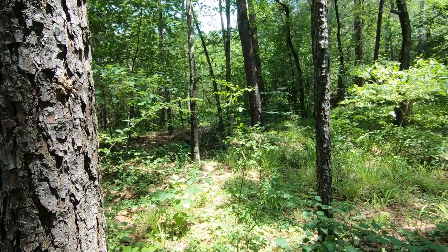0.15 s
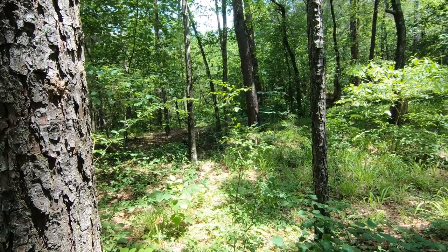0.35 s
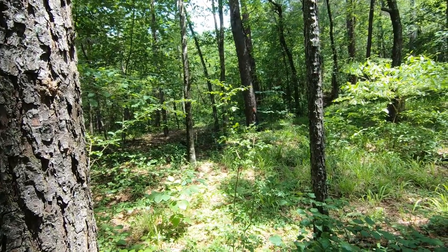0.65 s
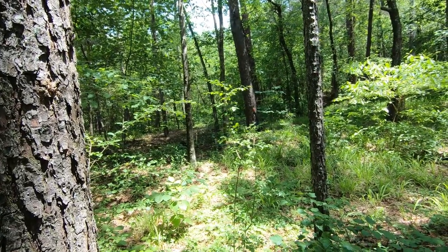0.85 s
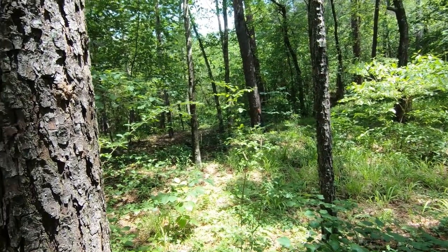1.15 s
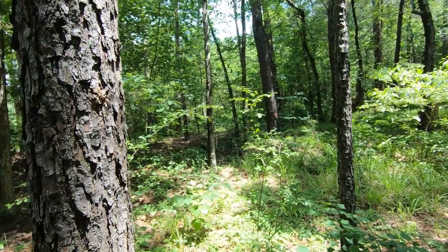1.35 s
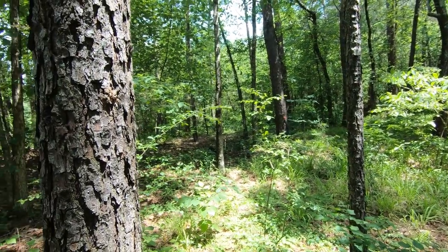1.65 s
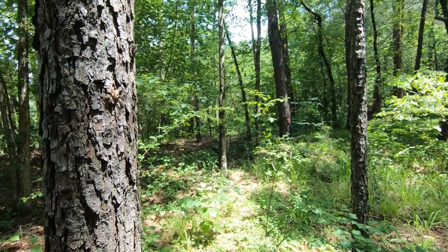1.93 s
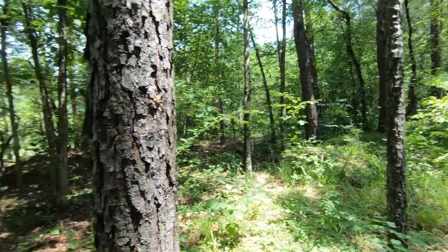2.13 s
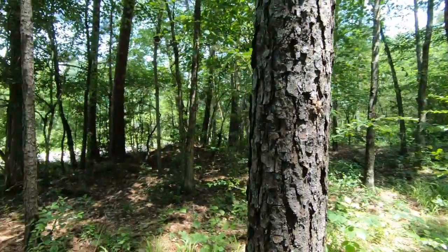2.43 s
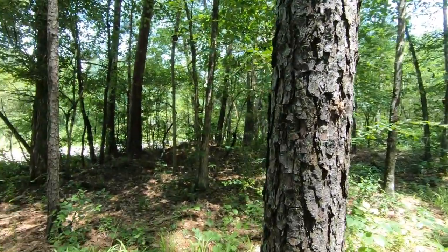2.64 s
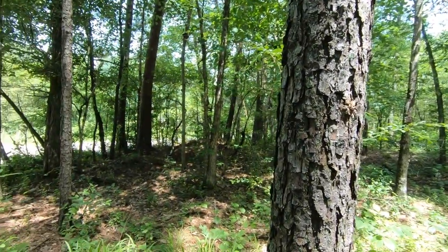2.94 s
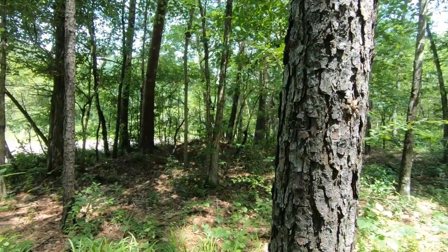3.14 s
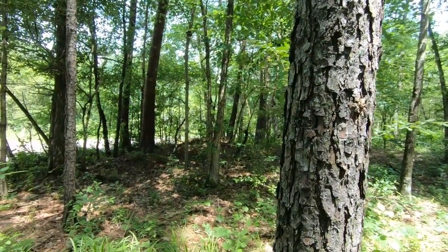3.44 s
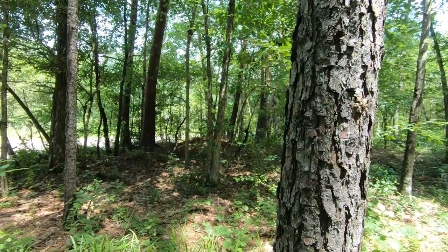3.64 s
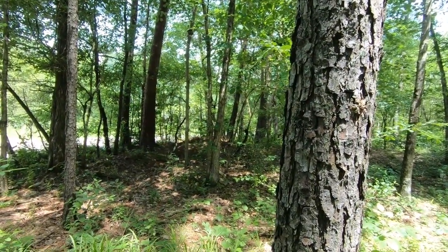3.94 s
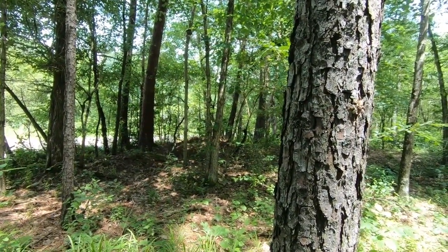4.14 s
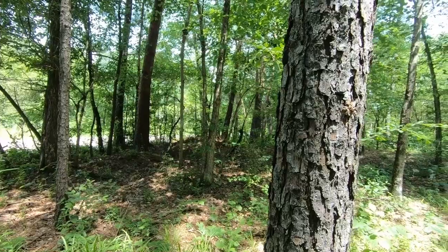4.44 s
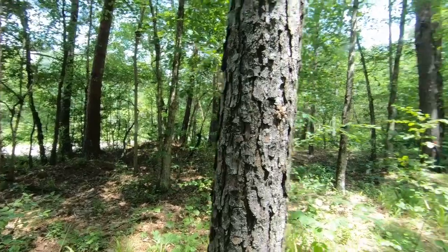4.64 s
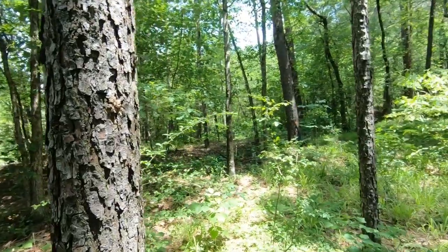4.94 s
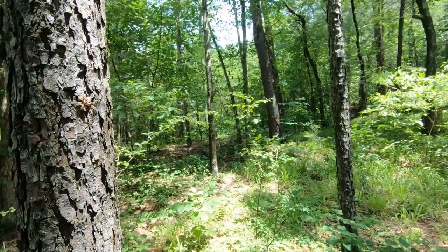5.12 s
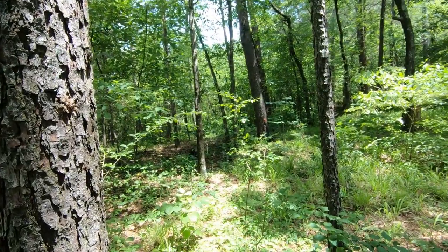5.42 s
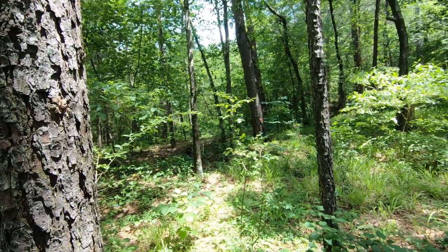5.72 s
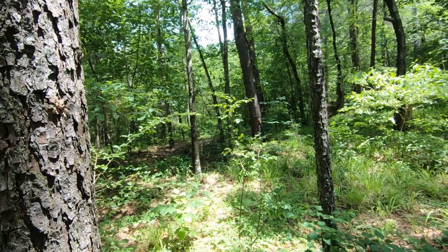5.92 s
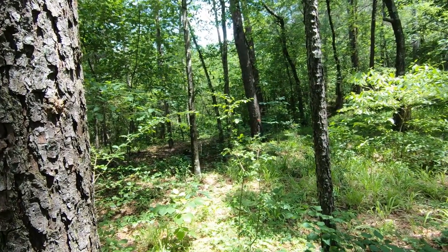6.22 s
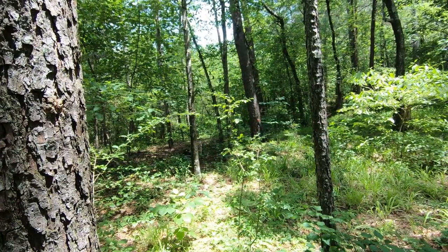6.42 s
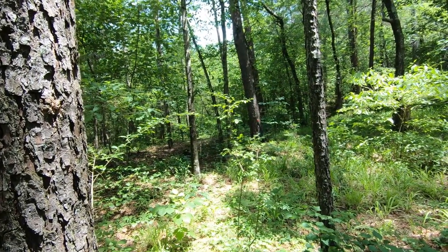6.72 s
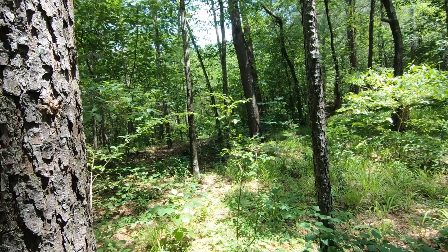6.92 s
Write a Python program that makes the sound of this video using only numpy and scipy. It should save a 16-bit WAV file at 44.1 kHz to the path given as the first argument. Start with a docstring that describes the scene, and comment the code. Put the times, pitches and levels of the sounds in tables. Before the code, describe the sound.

Quiet summer woodland picked up by a hand-held stereo microphone: faint steady hum, hiss and far traffic rumble. Sparse thin chirps begin, an insect rasps evenly, then muffled bumps and an air puff hit the microphone. Bird calls grow denser and louder, with buzzy notes and tiny peeps. More thumps follow, then a fast, gradually slowing trill amid leafy rustling, with slurred cheeps at the close.

```python
"""Small birds chirp, buzz and trill in summer woodland: near-sine notes on gliding pitch paths.
Trunks and leaves scatter each note into a soft tail; far birds blend into bands of flickering noise.
An insect rasps for a moment, noise with narrow resonances; a far road rumbles and mains hum wavers.
A hand-held camera is bumped (short decaying rings), and air buffets its two microphone ports.
Grainy noise swells as bright rustling and rougher washes. Wood levels are set before scene() lifts them."""
import sys
import numpy as np
from scipy import signal
from scipy.fft import rfft, irfft, next_fast_len
from scipy.io import wavfile

SR = 44100
rng = np.random.default_rng(int(sys.argv[2]) if len(sys.argv) > 2 else 0)


def unload_audio(sound):
    """Save the sound as a 16-bit wav file, at the path given as the first command line argument."""
    columns = np.transpose(np.atleast_2d(sound))
    # keep every value between -1 and 1, then stretch to whole-number steps
    steps = np.round(np.clip(columns, -1, 1) * 32767)
    wavfile.write(sys.argv[1], SR, steps.astype(np.int16))


N = 311787
TIME = np.arange(N) / SR


def undb(db):
    """Decibels to gain."""
    return 10 ** (np.asarray(db) / 20)


def unit(x):
    """Scale to rms 1."""
    return x / np.sqrt(np.mean(x ** 2))


def swell(curve):
    """Gain over time from (time [s], level [dB]) rows."""
    return undb(np.interp(TIME, *np.transpose(curve)))


def swells(events, rounding=0.24):
    """Gain over time of overlapping swells that each grow to a rounded peak and die away."""
    power = 0
    for peak, rise, fall, db in events:
        away = np.maximum((peak - TIME) / rise, (TIME - peak) / fall)
        power = power + (undb(db) * np.exp(rounding - np.hypot(away, rounding))) ** 2
    return np.sqrt(power)


def colour(x, points):
    """Filter by a spectrum of (frequency [Hz], level [dB]) points."""
    hz, db = np.transpose(points)
    size = next_fast_len(N)
    freq = np.fft.rfftfreq(size, 1 / SR) + 1  # the 1 keeps the logarithm finite
    gain = undb(np.interp(np.log(freq), np.log(hz), db))
    return irfft(rfft(x, size) * gain, size)[..., :N]


def noise(points, likeness=0):
    """Coloured noise of rms 1 at two ports; likeness is the share of power they have in common."""
    common, *own = rng.standard_normal((3, N))
    mixed = np.sqrt(likeness) * common + np.sqrt(1 - likeness) * np.array(own)
    return unit(colour(mixed, points))


def walk(rate):
    """Smooth random wandering of rms 1, with rate new values a second."""
    knots = rng.standard_normal(4096)
    return unit(np.interp(TIME * rate, np.arange(len(knots)), knots))


def add(out, start, sound):
    """Mix a stereo sound in at a time."""
    i = int(np.clip(start * SR, 0, N - 1))
    out[:, i:i + sound.shape[1]] += sound[:, :N - i]


WOOD_T60_S = 0.55  # time for the tail to fade by 60 dB


def trees(build_s=0.0092, early_db=5, early_s=0.0047, likeness=0.34):
    """Echoes from one perch: a dense early scatter off near trunks, then the long fade of the wood."""
    t = TIME[:SR * 3 // 5]
    common = np.sqrt(likeness) * rng.standard_normal(len(t))
    scatter = common + np.sqrt(1 - likeness) * rng.standard_normal((2, len(t)))
    fade_db = early_db * np.exp(-t / early_s) - 60 * t / WOOD_T60_S
    echo = scatter * undb(fade_db) * (1 - np.exp(-t / build_s))
    return echo / np.sqrt(np.sum(echo ** 2) / 2)


def note(length, start_hz, middle_hz, end_hz, db, echo_db, warble_rate=0, warble_hz=0,
         waver=0.0055, sweep_waver=0.038, flutter_db=1.5, edge=0.15, throb_db=-0.9):
    """One near-sine whistle on an arched pitch path, with its echo; a fast warble turns it into a buzz."""
    t = TIME[:int(length * SR)]
    # four random wanderings, 300 new values a second
    chances = [np.interp(t * 300, np.arange(64), k) for k in rng.standard_normal((4, 64))]
    pitch_chance, level_chance, pace_chance, depth_chance = chances
    warble = np.sin(2 * np.pi * np.cumsum(warble_rate * (1 + 0.088 * pace_chance)) / SR)

    # two parts smooth arch to one part straight lines, so the path bends gently
    knots = [0, length / 2, length], [start_hz, middle_hz, end_hz]
    arch = np.polyval(np.polyfit(*knots, 2), t)
    path = (2 * arch + np.interp(t, *knots)) / 3
    # wide sweeps are less steady than held whistles
    unsteady_hz = waver * path + sweep_waver * abs(end_hz - start_hz)
    hz = path + unsteady_hz * pitch_chance + warble_hz * warble * (1 + .25 * depth_chance)

    # a buzz is weaker at both rims of its pitch swing
    rim_db = -4 * warble ** 2
    level_db = db + flutter_db * level_chance + throb_db * warble + rim_db
    force = signal.windows.tukey(len(t), edge) * undb(level_db)
    tone = np.sqrt(2) * force * np.sin(2 * np.pi * np.cumsum(hz) / SR)

    # leaves take more of a high note out of the direct path and scatter it
    leaves_db = np.interp(middle_hz, [3000, 6000], [0, 2.5])
    paths = undb(echo_db + 0.35 * leaves_db) * trees()
    paths[0, 0] += undb(-leaves_db)  # the direct sound reaches the left port a sample earlier
    paths[1, 1] += undb(-leaves_db)
    return signal.fftconvolve(tone[None], paths, axes=1)


def sing(build, start, length, hz, db):
    """One call as (start, sound) notes, its build stretched and transposed."""
    notes = []
    for onset, share, first, middle, last, note_db, echo_db in build:
        sound = note(share * length, first * hz, middle * hz, last * hz, db + note_db, echo_db)
        notes.append((start + onset * length, sound))
    return notes


# buzzy notes: (time [s], length [s], start [Hz], end [Hz], level [dB], echo [dB],
# warble rate [1/s], warble depth [Hz])
BUZZ_NOTES = [(0, 0.08, 6340, 5180, -60, 1.5, 123, 690), (0.174, 0.087, 6120, 6520, -57, 1, 100, 700),
              (0.257, 0.028, 3750, 3780, -74, 1, 160, 200), (.31, 0.052, 5700, 5210, -65.5, 5.5, 110, 603),
              (0.504, 0.047, 5100, 4500, -65, 5.5, 70, 400), (0.555, 0.045, 5430, 5770, -57.5, -3, 80, 170),
              (.545, 0.053, 4000, 4300, -71, 2, 90, 350), (0.596, 0.047, 6270, 6500, -57, 1.5, 78, 430),
              (0.721, 0.041, 4890, 4830, -61.5, 2, 103, 260),
              (0.803, 0.026, 5000, 5130, -64.5, 5, 110, 300), (0.822, 0.033, 4200, 3750, -66, -1, 90, 330),
              (1.638, 0.13, 6530, 6050, -55.5, 4.5, 54, 775), (1.756, 0.046, 5100, 4140, -58, 2, 70, 397),
              (3.254, 0.16, 6250, 5870, -49.5, -1.5, 110, 690),
              (3.693, 0.024, 6650, 6360, -50, 4.5, 96, 250), (3.721, 0.027, 5950, 5480, -55, -5, 126, 472),
              (3.724, 0.053, 4300, 3500, -69, 1, 100, 400), (3.989, 0.044, 6750, 5750, -47.5, 0, 113, 420),
              (4.166, 0.12, 6350, 6110, -50.5, -3, 75, 615),
              (4.263, 0.049, 5550, 4600, -56, -5.5, 110, 550),
              (4.493, 0.098, 5800, 5640, -51.5, -7, 106, 330),
              (4.742, 0.027, 5790, 5230, -51, -8, 120, 350), (4.762, .025, 6100, 6460, -55, 2, 120, 550),
              (4.971, 0.03, 6510, 6700, -52.5, -2, 136, 330), (6.344, 0.067, 6430, 6500, -60.5, 4, 58, 840),
              (4.601, 0.067, 1680, 1930, -73, -4, 79, 140), (4.631, 0.042, 2020, 2190, -75, 1, 100, 190),
              (4.632, 0.1, 2410, 2550, -69.5, -2, 98, 95), (4.805, 0.0367, 2100, 1818, -67, 2.5, 110, 260),
              (5.072, 0.036, 2020, 1650, -68, 5.5, 106, 190), (5.125, 0.0624, 1937, 2078, -63, 0, 74, 140),
              (6.671, 0.088, 3253, 3046, -58.5, 2.5, 120, 232),
              (6.739, 0.085, 3080, 2530, -62.5, -2.5, 133, 350)]
BUZZ_ARCH = 1.02  # middle pitch over the mean of start and end


def buzzes():
    """Slightly arched glides whose pitch swings fast enough to sound buzzy."""
    out = np.zeros((2, N))
    for start, length, start_hz, end_hz, *voice in BUZZ_NOTES:
        middle_hz = BUZZ_ARCH * (start_hz + end_hz) / 2
        add(out, start, note(length, start_hz, middle_hz, end_hz, *voice))
    return out


# far birds blended by the trees: (time [s], level [dB])
CHORUS_LEVEL = [(0, -67), (.9, -67), (2.3, -64), (2.7, -59.5), (3.2, -64.5), (4.1, -64), (5.8, -59),
                (6.2, -61.5), (6.45, -58.5), (6.7, -76.5), (7.07, -62)]
# bands of the chorus that start below 4.8 kHz, relative to the rest: (time [s], level [dB])
LOW_VOICES_LEVEL = [(0, -2), (.3, -9), (.6, -3.5), (2.2, 3), (2.35, -6), (2.6, 1), (2.82, -3.5), (3.05, 5),
                    (3.32, 1), (3.7, 1), (4.3, -2.5), (4.5, -3.5), (5.4, -1.5), (5.9, -1), (7.07, -1)]
# tone colour of the chorus: (frequency [Hz], relative level [dB])
CHORUS_SPECTRUM = [(2500, -19.5), (3400, -4), (4500, 0), (5500, 2), (6500, 7), (7200, -9.5), (7800, -5.5),
                   (8400, -50)]


def chorus(flicker_db=2.0):
    """Far birds: each pitch region comes and goes on its own; the lower voices also swell and dip together."""
    wash, out = noise(CHORUS_SPECTRUM, likeness=0.91), 0
    for low in range(2400, 8400, 600):
        band_filter = signal.butter(2, [low, low + 600], "band", fs=SR, output="sos")
        # shifting the noise in time keeps neighbouring bands unlike
        band = signal.sosfilt(band_filter, np.roll(wash, low, axis=1))
        voices = swell(LOW_VOICES_LEVEL) if low < 4800 else 1
        out = out + band * voices * undb(flicker_db * walk(24))
    return unit(out) * swell(CHORUS_LEVEL)


def far_chirps(count=36, low_hz=3600, high_hz=7000, length=0.011, glide=0.157, over_chorus_db=-9, echo_db=3):
    """Faint short glides at random times and pitches, rising or falling; their level follows the chorus."""
    out = np.zeros((2, N))
    for k, (when, pitch, slope) in enumerate(rng.random((count, 3))):
        start = (k + when) / count * N / SR
        hz = low_hz + pitch * (high_hz - low_hz)
        bend = glide * (2 * slope - 1)
        db = np.interp(start, *np.transpose(CHORUS_LEVEL)) + over_chorus_db
        add(out, start, note(length, hz * (1 - bend), hz, hz * (1 + bend), db, echo_db))
    return out


# road rumble alike at both ports: (frequency [Hz], relative level [dB per Hz])
ROAD_COMMON = [(60, 1), (100, -17.5), (150, 1), (200, -1), (260, -13), (400, -21.5), (560, -29.5),
               (760, -22.5), (1050, -32.5), (1500, -30.5), (2600, -41), (8000, -54.5)]
# road rumble opposed at the ports: (frequency [Hz], relative level [dB per Hz])
ROAD_OPPOSED = [(60, -0.5), (100, -15), (150, -1), (200, 0.5), (260, -8.5), (400, -17.5), (560, -19.5),
                (780, -10.5), (1050, -21.5), (1500, -21.5), (2600, -36.5), (8000, -67)]
# tone colour of tyres: (frequency [Hz], relative level [dB])
TYRE_SPECTRUM = [(400, -20.5), (620, -9), (760, 0), (900, -13), (1400, -11), (4000, -54)]
# tyres swelling on the far road: (peak time [s], rise [s], fall [s], level before drone swell [dB])
TYRE_SWELLS = [(6.95, 0.099, 0.26, -69)]
# mains hum before its wavering and port balance: (frequency [Hz], level [dB])
HUM_TONES = [(120, -84), (179.3, -57.5), (240, -85.5), (299, -75.5)]
# slow rise and fall of the far rumble and hum: (time [s], level [dB])
DRONE_SWELL = [(0, 0.5), (.9, 0), (1.3, 1), (1.8, 0), (3.7, 0.5), (4.2, -1), (5.1, 1), (6.3, -0.3),
               (7.07, 0)]
# tone colour of the microphone hiss: (frequency [Hz], relative level [dB])
HISS_SPECTRUM = [(1000, -9), (7000, 15.5), (8500, 2.5), (12500, -4.5)]


def distance(common_db=-53.0, opposed_db=-53.5, hiss_db=-69.5, waver_db=3.0, left_db=1.0):
    """Far road rumble as noise, mains hum as wavering sines, and the microphone's own hiss."""
    ports = np.array([[1], [-1]])
    road = undb(common_db) * noise(ROAD_COMMON)[0]
    road = road + undb(opposed_db) * noise(ROAD_OPPOSED)[0] * ports
    tyres = noise(TYRE_SPECTRUM, likeness=.7) * swells(TYRE_SWELLS)
    road = road * undb(.8 * walk(8)) + tyres
    hum = 0
    for hz, db in HUM_TONES:
        level = np.sqrt(2) * undb(db + waver_db * walk(8) + left_db * ports)
        phase = 2 * np.pi * hz * TIME + 0.5 * walk(4.3) + .5 * ports
        hum = hum + level * np.sin(phase)
    return (road + hum) * swell(DRONE_SWELL) + undb(hiss_db) * noise(HISS_SPECTRUM)


# tone colour of air on the ports: (frequency [Hz], relative level [dB])
WIND_SPECTRUM = [(15, -16), (30, 4), (45, -6.5), (60, -9), (90, -15.5), (200, -26.5), (600, -84)]
# puffs of air, before flutter and port balance: (peak time [s], rise [s], fall [s], level [dB])
PUFFS = [(.18, 0.03, 0.045, -42.5), (.83, 0.15, 0.13, -49.5), (1.3, 0.12, 0.2, -44.5),
         (2.2, 0.09, 0.12, -36), (4.93, 0.16, 0.14, -41), (5.78, 0.13, 0.13, -51), (6.25, 0.13, 0.14, -47)]
BREEZE_DB = -64  # steady air, before flutter and port balance


def wind():
    """Air buffets the ports: mostly low noise, a faint steady breeze with stronger puffs."""
    strength = np.hypot(undb(BREEZE_DB), swells(PUFFS))
    balance_db = np.array([[1], [-2.5]])  # left, right
    flutter = undb(2.8 * walk(14) + balance_db)
    return noise(WIND_SPECTRUM, likeness=0.17) * strength * flutter


def grainy_noise(points, events, grain_db, uneven_db):
    """Coloured noise whose every grain has a random, bounded size, in uneven swells."""
    size_db = grain_db * np.minimum(rng.exponential(size=N), 4)
    grains = rng.standard_normal((2, N)) * undb(size_db)
    return unit(colour(grains, points)) * swells(events) * undb(uneven_db * walk(45))


# tone colour of the bright rustling: (frequency [Hz], relative level [dB])
BRIGHT_SPECTRUM = [(800, -9), (2000, 1), (3500, -18.5), (5000, 6), (7200, 11), (8300, -7.5), (10000, -13),
                   (13000, -24)]
# swells of bright rustling noise; the first two are the treble of the insect's rasp:
# (peak time [s], rise [s], fall [s], level [dB])
BRIGHT_SWELLS = [(1.17, 0.49, 1, -64), (2.1, 0.39, 0.16, -63), (2.75, 0.42, 0.79, -69),
                 (4.68, 0.38, 0.51, -61.5), (5.58, 0.19, 0.36, -58), (5.87, 0.19, 0.16, -62),
                 (6.4, 0.2, 0.22, -59), (7.05, 0.17, .2, -65.5)]


def bright_rustle():
    """Bright grainy noise: first the treble of the insect's rasp, then rustling."""
    return grainy_noise(BRIGHT_SPECTRUM, BRIGHT_SWELLS, grain_db=-0.5, uneven_db=2.0)


# The build of each call, one row a note: (onset [share of call], length [share of call],
# start, middle and end pitch [multiples of call pitch], relative level [dB], echo [dB])
WHISTLE_BUILD = [(0, 1, 1.007, 1, .995, 0, -2)]
PEEP_BUILD = [(0, 1, .96, 1, .98, 0, -8)]
DOWNSLUR_BUILD = [(0, 1, 1.13, 1, .85, 0, 1)]
UPSLUR_BUILD = [(0, .42, .9, .95, 1, -2, -3), (.38, .62, 1, 1.005, 1, 0, -3)]
FLICK_BUILD = [(0, 1, .9, 1, 1.12, 0, -4)]
HOOK_BUILD = [(0, .72, .985, 1, .99, 0, -6), (.68, .32, .99, .9, .8, -3, -4)]
TSEEP_BUILD = [(0, .7, 1.15, 1, .96, 0, -1), (.55, .45, .85, .66, .56, -14, -6)]
SWOOP_BUILD = [(0, .3, 1.19, 1.03, .98, -1, -1), (.28, .27, .99, .93, .81, -1, -3),
               (.91, .13, .8, .87, .98, -1, -7)]
SAG_BUILD = [(0, .4, 1.1, 1.08, 1.05, 0, -3), (.42, .58, 1.01, .975, .975, -.5, -3)]
ZIP_BUILD = [(0, 1, 1.25, 1, .65, 0, 2)]
SIGH_BUILD = [(0, .36, .97, 1, 1.035, -5, 0), (.31, .69, 1.045, 1, .95, 0, -4)]
CHEER_BUILD = [(0, .34, .95, 1.02, 1.12, -6, -4), (.2, .42, .77, .87, 1, -2.5, -5),
               (.52, .48, .98, .965, .7, 1, -5)]
DROP_BUILD = [(0, 1, 1.1, 1, .81, 0, -3.5)]  # a short fall in pitch that follows the first two cheers
# When each call is sung: (time [s], length [s], pitch [Hz], level [dB])
WHISTLES_SUNG = [(0.11, 0.081, 4620, -72), (0.42, 0.05, 4540, -69), (.815, 0.063, 6400, -61),
                 (0.885, 0.079, 6750, -54.5), (1.743, 0.033, 3480, -60), (2.76, 0.097, 6645, -54),
                 (2.996, 0.057, 5490, -51.5), (3.15, .04, 5400, -59), (3.207, 0.061, 3480, -75),
                 (3.24, 0.041, 5440, -57), (4.305, 0.024, 5854, -50), (5.06, 0.063, 6150, -59.5),
                 (6.366, 0.042, 1884, -71.5)]
PEEPS_SUNG = [(1.04, .025, 6250, -59), (1.315, .025, 6220, -58), (3.848, 0.023, 4270, -61.5),
              (3.913, 0.018, 4280, -62), (3.96, 0.015, 6570, -54), (4.149, 0.023, 4220, -64)]
DOWNSLURS_SUNG = [(1.748, 0.014, 2520, -64.5), (2.573, 0.018, 5610, -57), (2.719, 0.015, 5430, -58.5),
                  (2.834, 0.027, 5430, -58.5), (3.065, 0.015, 5850, -54), (3.683, 0.018, 6680, -61),
                  (4.553, 0.018, 5660, -59), (4.946, .05, 2710, -85)]
UPSLURS_SUNG = [(.775, 0.031, 4360, -60.5), (1.794, 0.018, 4370, -71), (2.175, 0.04, 4290, -58.5),
                (2.429, 0.062, 4340, -65)]
FLICKS_SUNG = [(2.603, .028, 7280, -62), (2.751, .024, 7000, -65), (2.975, 0.038, 5100, -66),
               (4.665, 0.038, 4240, -64.5), (4.757, 0.024, 6180, -54), (4.854, 0.043, 4470, -59),
               (5.296, 0.021, 6450, -56), (5.436, 0.016, 6350, -66)]
HOOKS_SUNG = [(1.13, 0.096, 5460, -56), (1.41, 0.06, 5460, -56), (3.632, 0.031, 5140, -70),
              (3.866, 0.039, 4970, -58.5), (6.977, 0.028, 2360, -57.5)]
TSEEPS_SUNG = [(2.038, .066, 6370, -52), (2.298, 0.073, 6560, -55)]
SWOOPS_SUNG = [(2.986, .118, 2870, -68), (3.383, .142, 2840, -63.5)]
SAGS_SUNG = [(3.11, 0.079, 3445, -70), (3.533, 0.062, 3500, -64)]
ZIPS_SUNG = [(0.37, 0.013, 3900, -71.5), (.589, 0.015, 3900, -74), (0.812, 0.014, 3900, -70.5)]
SIGHS_SUNG = [(4.655, .11, 2087, -62.5), (5.163, .097, 2090, -61)]
CHEERS_SUNG = [(6.157, 0.089, 3102, -64), (6.484, 0.07, 3057, -59), (6.896, .055, 3165, -60)]
DROPS_SUNG = [(6.257, 0.0206, 2700, -66), (6.572, 0.024, 2520, -60.5)]


def calls():
    """Each kind of call keeps its build of gliding notes every time it is sung."""
    out = np.zeros((2, N))
    repertoire = [
        (WHISTLE_BUILD, WHISTLES_SUNG), (PEEP_BUILD, PEEPS_SUNG), (DOWNSLUR_BUILD, DOWNSLURS_SUNG),
        (UPSLUR_BUILD, UPSLURS_SUNG), (FLICK_BUILD, FLICKS_SUNG), (HOOK_BUILD, HOOKS_SUNG),
        (TSEEP_BUILD, TSEEPS_SUNG), (SWOOP_BUILD, SWOOPS_SUNG), (SAG_BUILD, SAGS_SUNG),
        (ZIP_BUILD, ZIPS_SUNG), (SIGH_BUILD, SIGHS_SUNG), (CHEER_BUILD, CHEERS_SUNG),
        (DROP_BUILD, DROPS_SUNG)]
    for build, sung in repertoire:
        for call in sung:
            for start, sound in sing(build, *call):
                add(out, start, sound)
    return out


# bumps on the camera: (time [s], ring [Hz], level [dB], rise [s], likeness of the ports [-1 to 1])
CAMERA_BUMPS = [(0.595, 101, -33.5, 0.0077, -0.66), (2.11, 93.7, -22.5, 0.013, -0.9),
                (2.142, 57, -27.5, 0.012, -0.27), (2.218, 41.4, -27, 0.026, 0.99),
                (2.292, 26, -21.5, 0.017, 0.98), (3.286, 128, -31.5, 0.011, -0.42),
                (3.286, 70, -36, 0.017, 0.14), (4.608, 108, -24, 0.012, -0.85),
                (4.83, 27.8, -31.5, 0.047, -0.16), (4.949, 130, -41, 0.0067, 0.41),
                (5.021, 74, -27.5, 0.011, -0.14)]


def bumps():
    """Soft knocks rock the camera body for a few cycles; unlike ports swing out of step."""
    out, t = np.zeros((2, N)), TIME[:SR // 4]
    for start, hz, db, rise, likeness in CAMERA_BUMPS:
        push = (t / rise * np.exp(1 - t / rise)) ** 2
        apart = np.array([[0], [np.arccos(likeness)]])  # phase lead of the right port
        add(out, start, undb(db) * push * np.sin(2 * np.pi * hz * t + apart))
    return out


# tone colour of the rasp: (frequency [Hz], relative level [dB])
RASP_SPECTRUM = [(1700, -18.5), (2100, -7), (2650, -14.5), (3000, -5.5), (3900, -2.5), (4500, 2),
                 (6500, -0.5), (7500, 0.5), (8100, -27), (11000, -51)]
# the insect's wing resonances: (frequency [Hz], width [Hz], relative level [dB])
WING_RESONANCES = [(2960, 13, -5), (3306, 30, -3), (4600, 130, -21), (5100, 81, -9), (5500, 82, -13),
                   (7400, 170, -18)]


def insect(start=0.934, stop=2.31, db=-58.5, modes_db=-9, shiver_db=1.0):
    """A dry, even rasp of noise with a few narrow wing resonances; it fades in and stops short."""
    scrape = rng.standard_normal((2, N))
    ring = 0
    for hz, width, mode_db in WING_RESONANCES:
        resonance = signal.iirpeak(hz, hz / width, fs=SR)
        ring = ring + undb(mode_db) * unit(signal.lfilter(*resonance, scrape))
    rasp = noise(RASP_SPECTRUM, likeness=0.67) + undb(modes_db) * ring
    gate = np.clip((TIME - start) / 0.087, 0, 1) * np.clip((stop - TIME) / 0.047, 0, 1)
    return rasp * gate * undb(db + shiver_db * walk(90))


# soft, low coos: (time [s], length [s], start [Hz], middle [Hz], end [Hz], level [dB], echo [dB])
COO_NOTES = [(1.476, 0.083, 274, 253, 232, -59, -19), (5.291, 0.089, 580, 610, 585, -75, -2)]


def coos():
    """Soft, low whistled notes that bend only a little."""
    out = np.zeros((2, N))
    for start, *shape in COO_NOTES:
        add(out, start, note(*shape))
    return out


# tone colour of the rough washes: (frequency [Hz], relative level [dB])
ROUGH_SPECTRUM = [(300, -1), (700, 8), (1400, 8), (2200, 13.5), (3500, 13.5), (6000, -9), (8500, -50)]
# swells of rough mid-pitched noise: # (peak time [s], rise [s], fall [s], level [dB])
ROUGH_SWELLS = [(2.17, 0.32, 0.081, -71), (2.75, 0.56, 0.73, -71), (5.04, 0.16, 0.37, -68),
                (5.52, 0.026, 0.085, -56), (6.4, 0.11, 0.23, -68)]


def rough_washes():
    """Mid-pitched noise with rougher grains, in swells."""
    return grainy_noise(ROUGH_SPECTRUM, ROUGH_SWELLS, grain_db=2.5, uneven_db=2.5)


# one stroke of the rattle: (length [s], start [Hz], middle [Hz], end [Hz])
RATTLE_NOTE = (.013, 5700, 4900, 4100)
RATTLE_START_S, RATTLE_PERIOD_S = 5.032, .0122


def rattle(count=5, db=-57, fade_db=1.0, echo_db=-5):
    """A burst of steep downward glides, each set weaker than the last."""
    out = np.zeros((2, N))
    for k in range(count):
        stroke = note(*RATTLE_NOTE, db - k * fade_db, echo_db)
        add(out, RATTLE_START_S + k * RATTLE_PERIOD_S, stroke)
    return out


# the trill's syllable rises, dips, rises and curls over: (onset [share], length [share],
# start, middle and end pitch [multiples of syllable pitch], relative level [dB], echo [dB])
TRILL_SYLLABLE = [(.19, .25, .84, .93, 1.04, -2, -9), (.41, .13, 1.02, .96, .94, 0, -9),
                  (.5, .31, .94, 1.05, 1.15, 0, -9), (.78, .2, 1.15, 1.14, 1.09, -6, -9)]
# the trill's loudness: (time [s], level [dB])
TRILL_LOUDNESS = [(5.2, -66.5), (5.55, -60.5), (5.7, -63), (5.85, -63), (5.92, -57), (6.14, -56),
                  (6.2, -64), (6.27, -61), (6.44, -61.5)]
SYLLABLE_S, SYLLABLE_HZ = .042, 4700
# each gap grows by twice the slowing
TRILL_START_S, TRILL_PERIOD_S, TRILL_SLOWING_S = 5.197, .05304, .000145


def trill(count=23, uneven_db=0.5):
    """A run of like, kinked upslurs that slows steadily and is strongest past its middle."""
    out = np.zeros((2, N))
    for k, chance in enumerate(rng.standard_normal(count)):
        onset = TRILL_START_S + k * TRILL_PERIOD_S + TRILL_SLOWING_S * k ** 2
        db = np.interp(onset, *np.transpose(TRILL_LOUDNESS)) + uneven_db * chance
        for start, sound in sing(TRILL_SYLLABLE, onset, SYLLABLE_S, SYLLABLE_HZ, db):
            add(out, start, sound)
    return out


def scene():
    """Everything together; the treble of the wood is weaker at the left port."""
    birds = buzzes() + far_chirps() + calls() + coos() + rattle() + trill()
    wood = birds + chorus() + bright_rustle() + insect() + rough_washes()
    left_treble = [(2300, -0.5), (3300, -0.5), (4400, -5.5), (5500, -13.0), (7200, -14.0), (8500, -0.5)]
    left = colour(wood[0], left_treble)
    wood = np.array([left, wood[1]]) * undb(3.5)
    return wood + distance() + wind() + bumps()


TOP_HZ = 13000


def record(dry):
    """The recorder cuts the top with a steep low-pass filter."""
    low_pass = signal.ellip(8, .2, 70, TOP_HZ, fs=SR, output="sos")
    return signal.sosfilt(low_pass, dry)


dry = scene()
out = record(dry)
unload_audio(out)
```